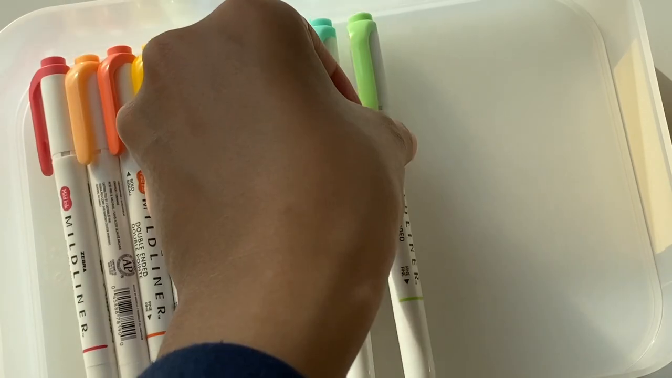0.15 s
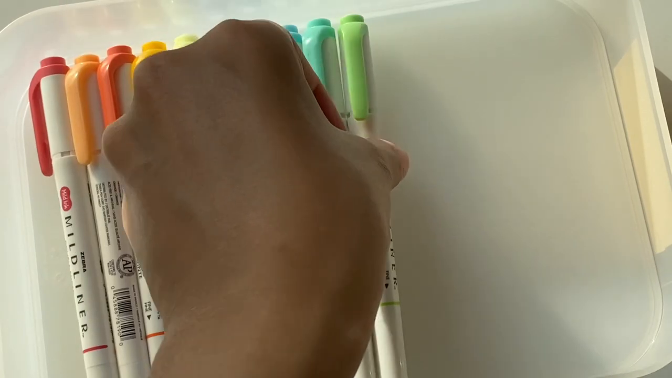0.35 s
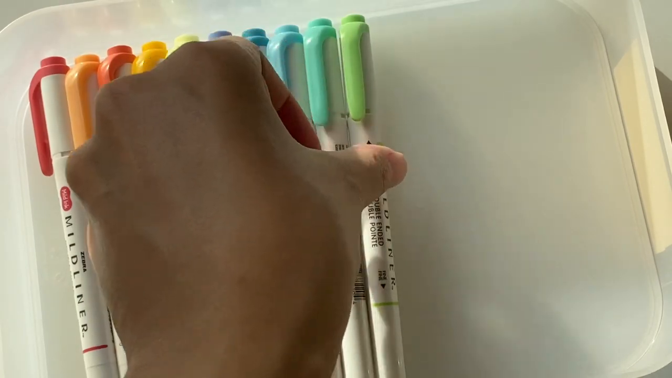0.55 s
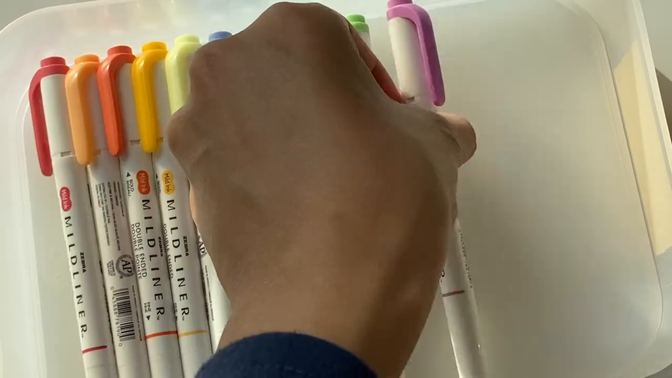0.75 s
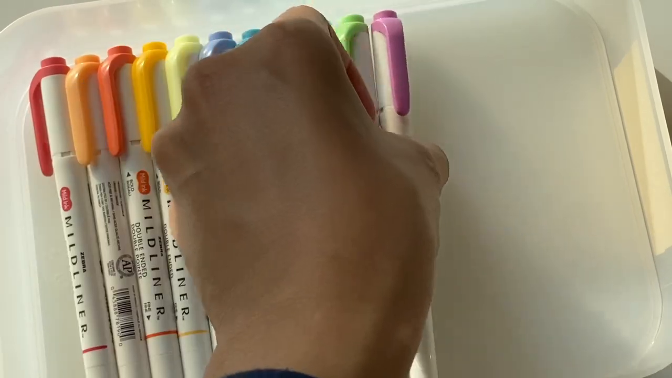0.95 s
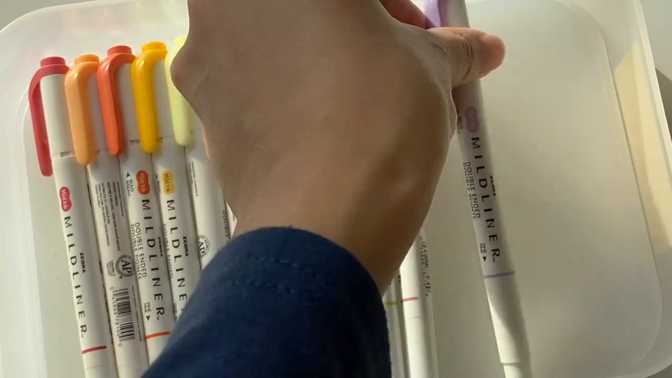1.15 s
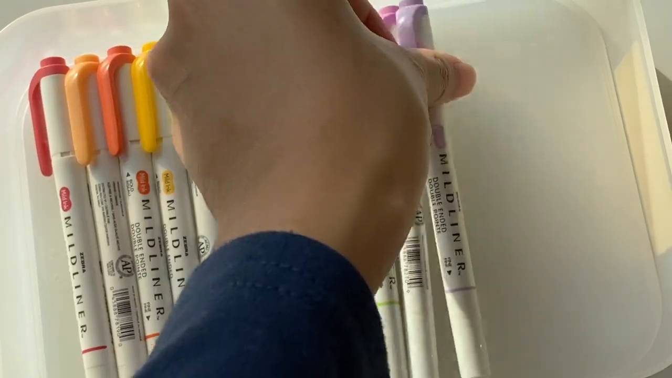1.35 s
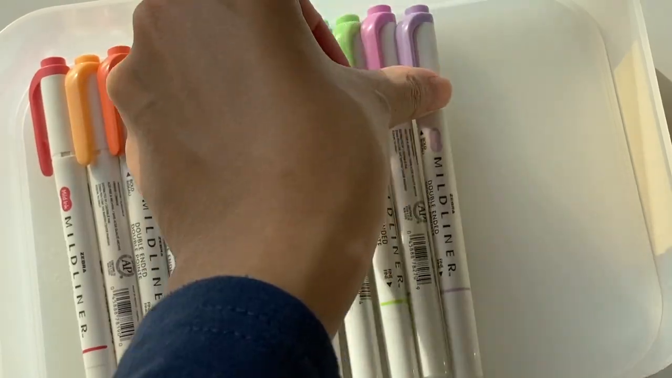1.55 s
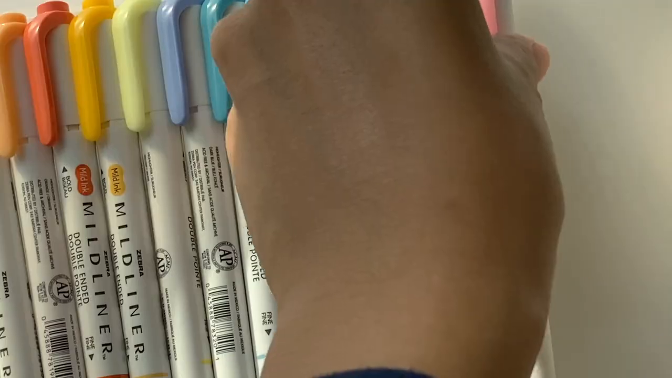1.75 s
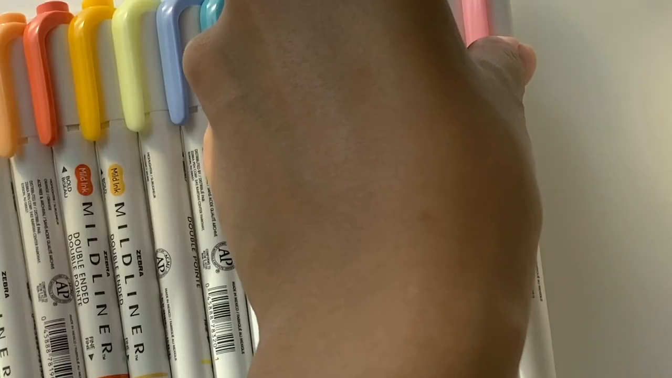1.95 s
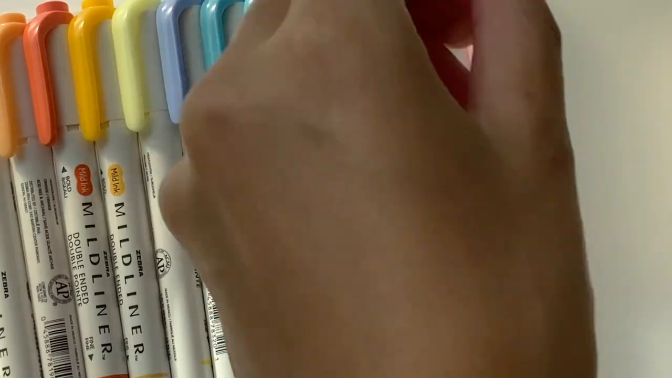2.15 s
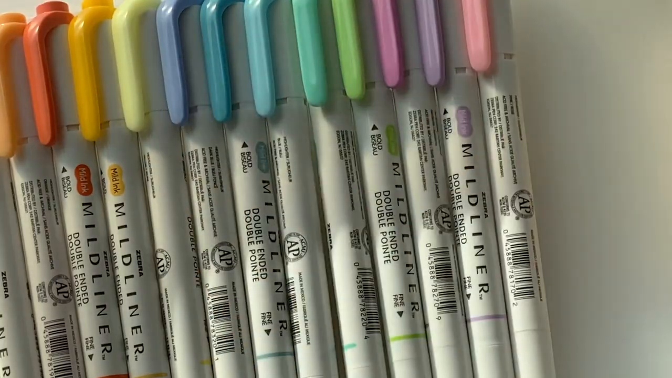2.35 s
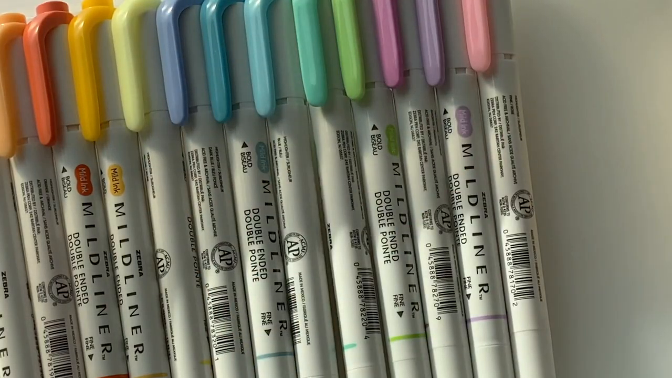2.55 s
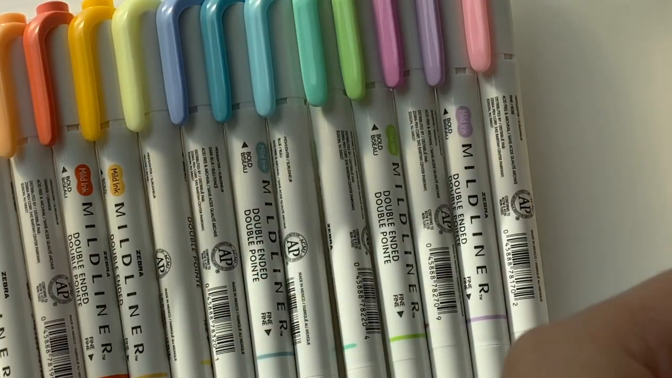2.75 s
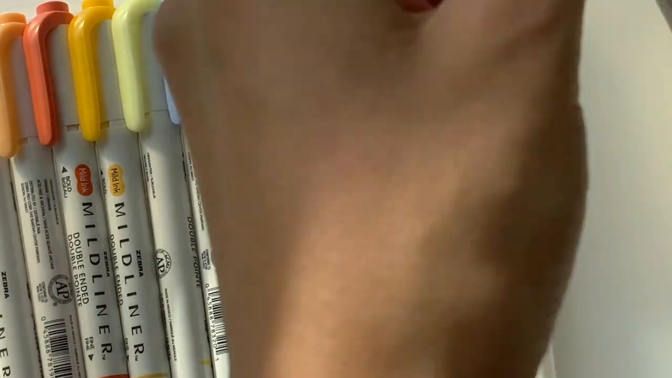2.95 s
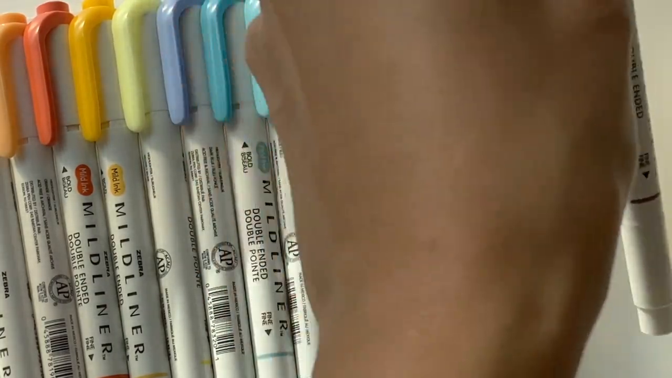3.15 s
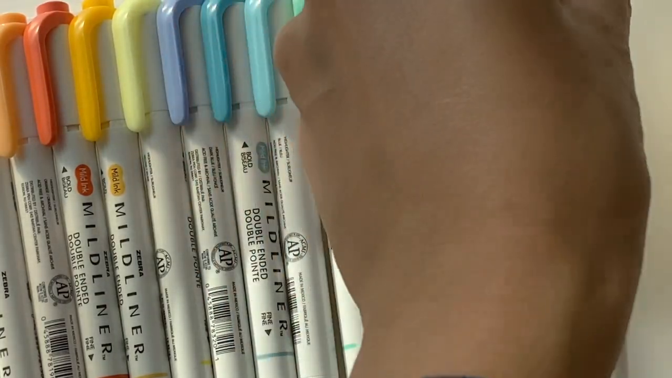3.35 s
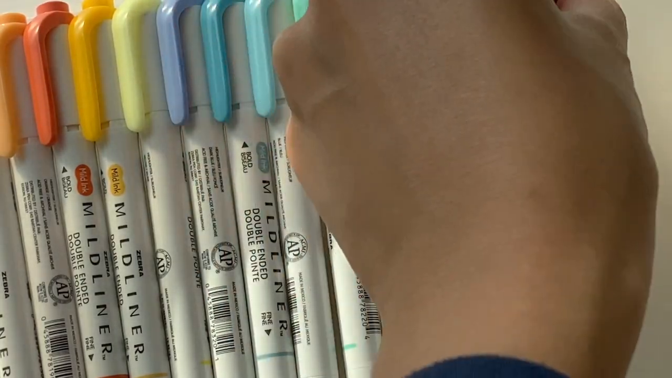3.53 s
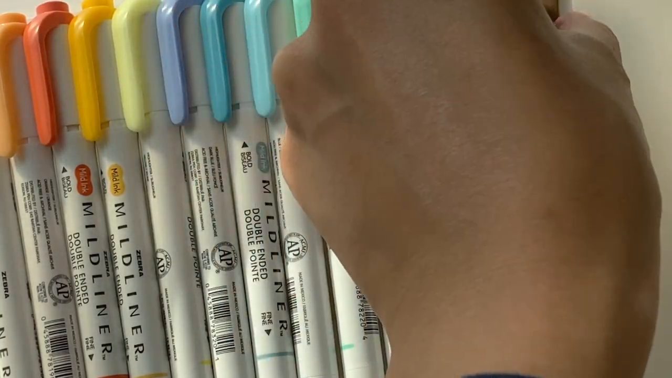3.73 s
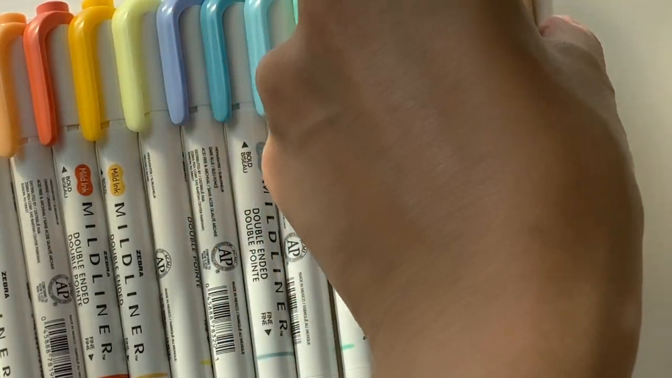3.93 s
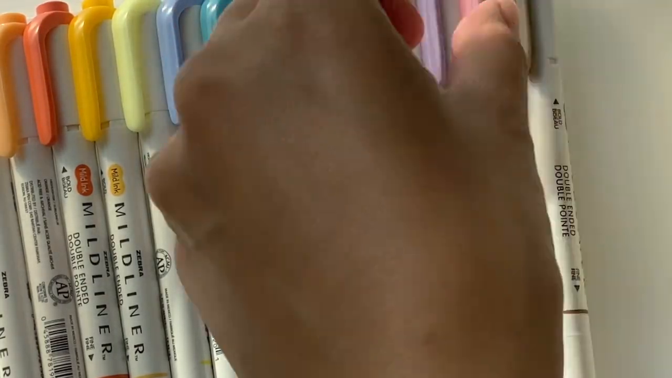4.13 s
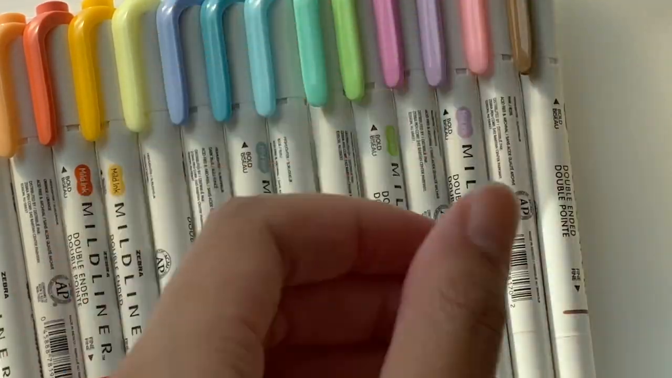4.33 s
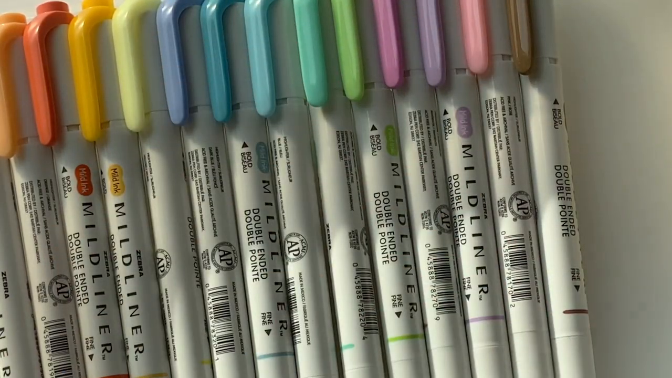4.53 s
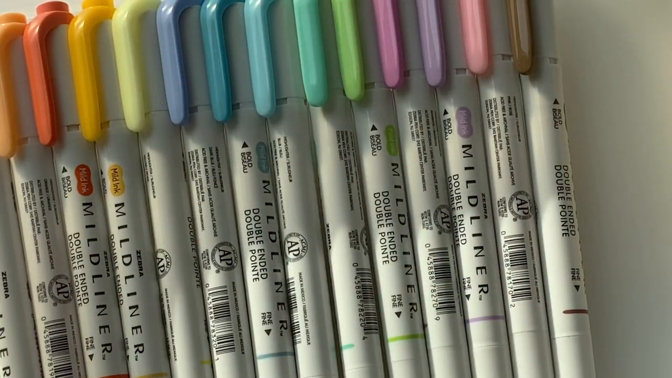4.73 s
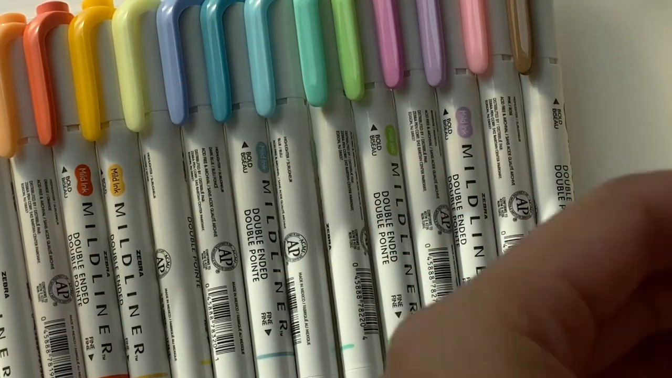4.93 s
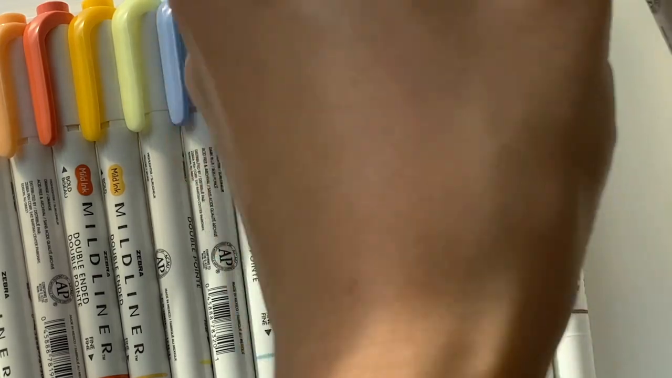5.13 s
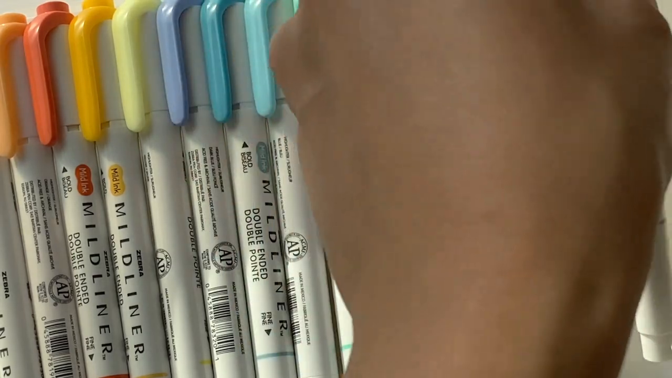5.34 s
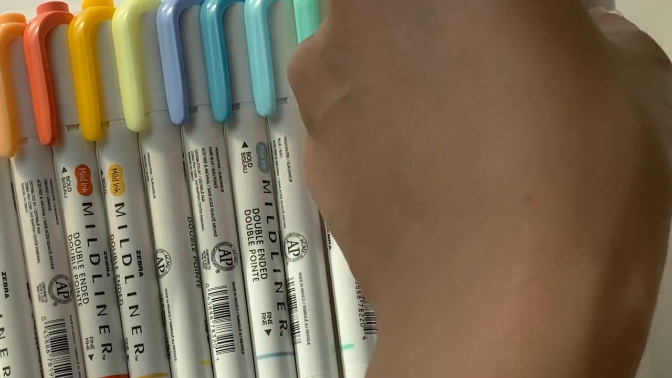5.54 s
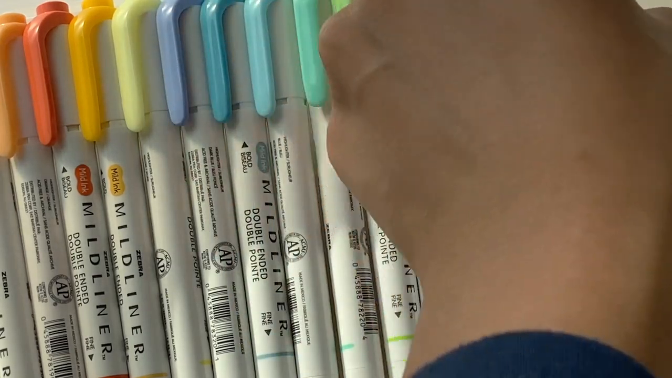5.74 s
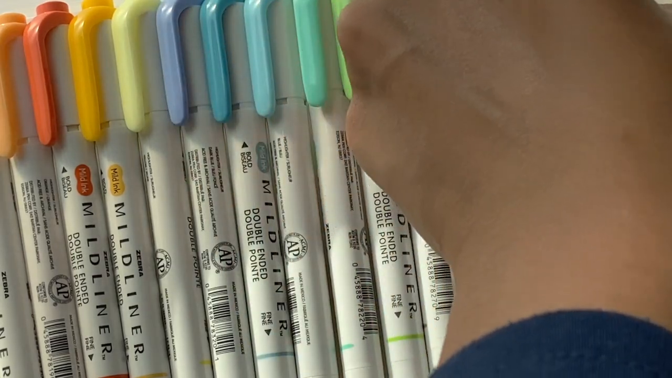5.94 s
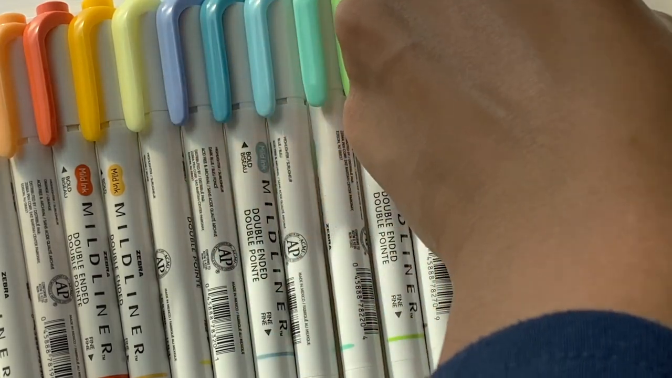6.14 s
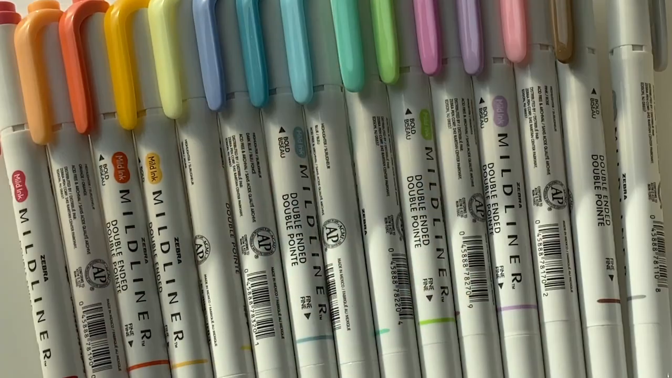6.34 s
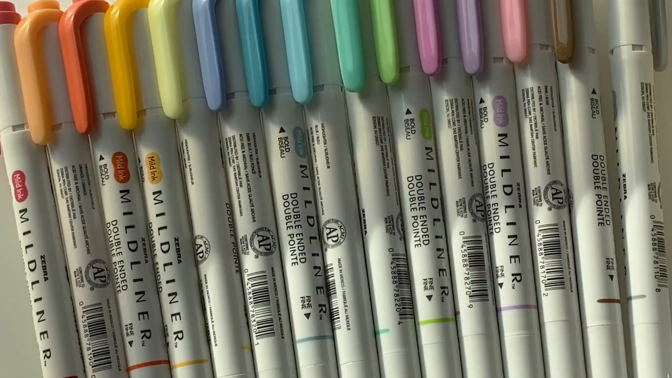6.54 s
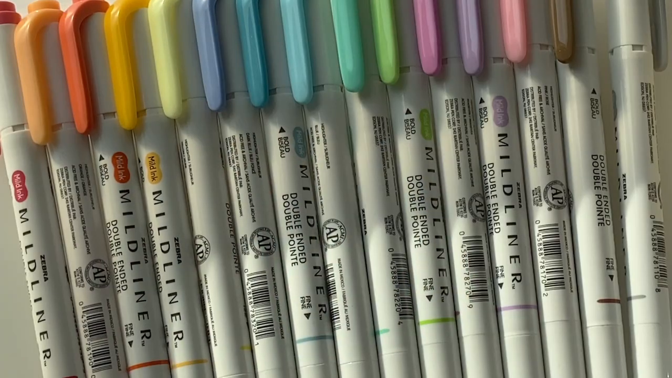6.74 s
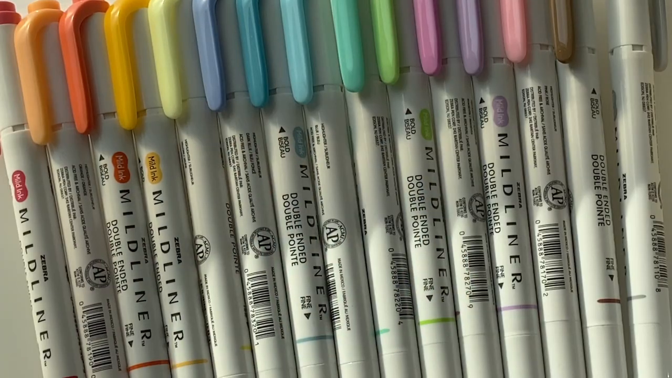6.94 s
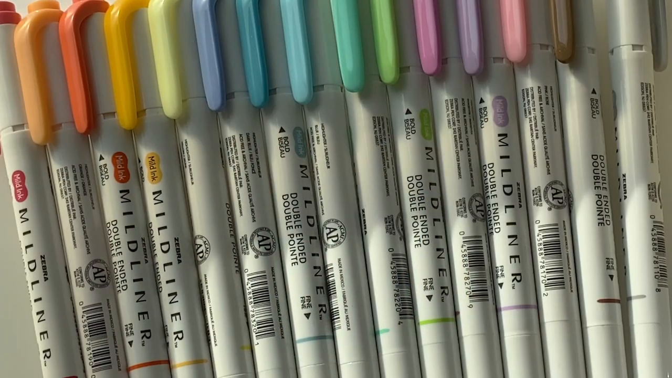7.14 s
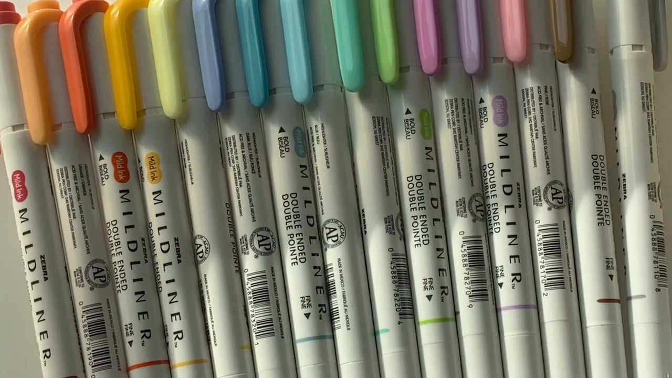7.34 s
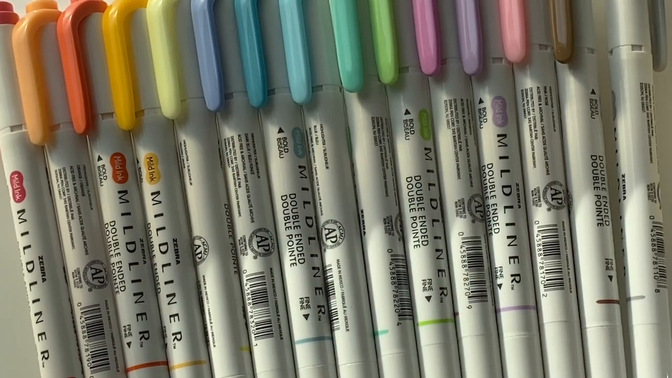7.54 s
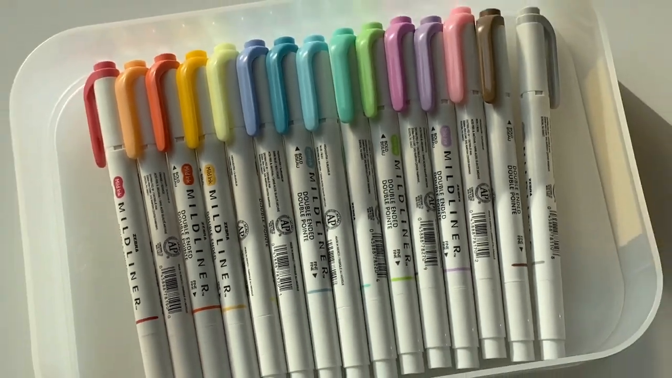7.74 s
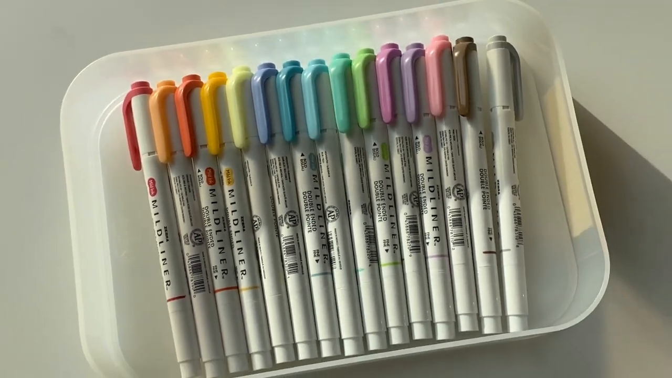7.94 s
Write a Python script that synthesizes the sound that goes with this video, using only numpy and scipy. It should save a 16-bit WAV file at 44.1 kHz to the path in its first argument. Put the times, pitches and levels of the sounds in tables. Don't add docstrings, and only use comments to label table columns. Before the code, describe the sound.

Three hard plastic pen clacks rattle a tray early on, then sparse clicks and taps break long near-silent stretches over faint rumble.

```python
import sys
import numpy as np
from scipy import signal
from scipy.fft import rfft, irfft, next_fast_len
from scipy.io import wavfile
from scipy.ndimage import uniform_filter1d

SR = 44100
rng = np.random.default_rng(int(sys.argv[2]) if len(sys.argv) > 2 else 0)


def volts(x):
    e = np.asarray(x, float) / 20
    return 10 ** e


def waveform_to_disk(signal):
    frames = np.transpose(np.atleast_2d(signal))
    scaled = np.clip(frames, -1, 1) * 32767
    samples = np.round(scaled).astype(np.int16)
    wavfile.write(sys.argv[1], SR, samples)


N = 351918

# start_s [s], level_db [dB], crack_db [dB re blow]
SCENES = [
    (0, -80, -1.5),
    (.074, -28, -30),
    (.778, -27, -17.5),
    (1.221, -11.5, -11),
    (1.815, -31.5, -40),
    (5.622, -35.5, -40),
    (6.188, -21.5, -14),
    (6.283, -130, 0),
]
# start_s [s], level_db [dB], cap_hz [Hz], barrel_hz [Hz], extra_thump_db [dB]
DROPS = [
    (0.1645, 4, 1962, 1260, 2.5),
    (0.801, 5, 2041, 1520, 1),
    (1.4436, 0, 2096, 1000, -0.5),
]
# delay_s [s], level_db [dB re blow], barrel_share [0 = cap pitch, 1 = barrel pitch],
# contact [name]
LANDING = [
    (-.002, -22.5, 0.1, "touch"),
    (0, -1, 0.13, "clack"),
    (.0042, -3, 1, "slap"),
    (.0097, -5, 1.1, "clack"),
]
CONTACT = {"clack": (-11, 650, 1.8), "slap": (-16.5, 680, 1.5), "tick": (-15, 260, 2.1),
           "click": (-23, 300, 2.1), "touch": (-7.5, 440, 2.1), "thud": (2.2, 735, 59),
           "press": (1.43, 455, 9.5)}
# start_s [s], level_db [dB], barrel_hz [Hz], crack_db [dB re blow]
CLACKS = [(.1954, -5.5, 2660, -15), (.376, -24, 2380, -18), (.778, -37, 1870, -23),
          (1.3168, -26.5, 1890, -31), (1.3693, -8.5, 1760, -25), (1.479, -7.5, 1750, -11.5),
          (1.6481, -8.5, 1584, -13.5), (1.6623, -13.5, 1760, -17), (3.4035, -12, 1390, -2),
          (3.4306, -13, 1820, -13), (5.4187, -16.5, 1480, -16.5), (6.0831, -35, 1305, -27)]
# start_s [s], level_db [dB], barrel_hz [Hz], crack_db [dB re blow]
TICKS = [(0.3224, -30, 1065, -12.5), (0.3383, -27.5, 1820, -13), (0.3592, -30.5, 1760, -14.5),
         (.3674, -26, 1937, -14), (1.3086, -26.5, 1750, -24.5), (1.7664, -41, 1983, -17),
         (2.6004, -56, 2266, -7.5), (3.5719, -32, 1450, -38.5), (5.8033, -50.5, 1220, -30),
         (6.2024, -9, 1356, -23.5), (5.5609, -30.5, 1120, -16.5)]
# start_s [s], level_db [dB], barrel_hz [Hz], crack_db [dB re blow]
CLICKS = [(0.2784, -19, 1950, -3), (.9682, -12.5, 2000, -11.5), (.9755, -23, 2340, -10),
          (.981, -24.5, 1950, -20), (5.4178, -18.5, 3080, -12), (6.2022, -7.5, 2350, -19.5),
          (7.6114, -54, 2080, -26), (1.7452, -33.5, 1010, -6), (2.342, -63, 3200, -6.5),
          (2.376, -34.5, 3450, -10), (5.7575, -39, 2000, -52)]
# start_s [s], level_db [dB], barrel_hz [Hz], crack_db [dB re blow]
TOUCHES = [(0.1397, -42, 1210, -24), (.153, -32, 1488, -24), (1.229, -23.5, 1007, -23),
           (1.243, -27, 1110, -20.5), (1.2907, -32.5, 1860, -17), (1.3457, -25, 1058, -27.5),
           (1.3524, -24.5, 1112, -3.5), (1.4103, -19.5, 1640, -9), (1.426, -20.5, 1850, -18.5),
           (1.4317, -11.5, 2016, -7.5), (3.3711, -21.5, 1610, -12.5), (3.3845, -23.5, 1399, -18),
           (3.8166, -44, 1340, -31.5), (3.8452, -34, 1080, -19), (6.1888, -41, 1820, -19),
           (5.4285, -19.5, 1370, -18.5)]
# start_s [s], level_db [dB], barrel_hz [Hz], crack_db [dB re blow]
THUDS = [
    (2.0213, -64.5, 1738, -14),
    (3.7075, -30.5, 1904, -30.5),
    (3.9709, -36.5, 1887, -44),
    (4.6474, -69, 980, -4),
    (7.501, -50, 2190, -29),
    (7.526, -62.5, 2200, -24),
]
# start_s [s], level_db [dB], barrel_hz [Hz], crack_db [dB re blow]
PRESSES = [
    (3.409, -19, 2000, -28),
    (3.7596, -39, 1430, -40),
    (6.107, -29, 1210, -36),
    (6.1543, -52, 2200, -19),
    (6.2102, -23.5, 1900, -33),
]
# pitch_hz [Hz], level_db [dB], t60_s [s]
TRAY_MODES = [(70.03, -0.5, 0.23), (115.4, -1, 0.16), (171, 0, .07), (258, -1, 0.029), (281, -1.5, 0.081),
              (353, 0, 0.059), (414, -1, .04), (520, -2, .04), (600.5, 1, 0.039), (678, -1, 0.024),
              (780, -3, 0.029), (878, -2, 0.03)]
# pitch_hz [Hz], level_db [dB], t60_s [s]
ROW_MODES = [(980, 1, 0.04), (1230, 0.5, 0.016), (1445, 3.5, .018), (1600, -15.5, .018), (1750, -6, 0.024),
             (1950, -2, .018), (2180, -0.5, 0.033), (2350, 1, .015), (2860, -5, .015), (2940, -3, 0.018),
             (3300, -2.5, 0.014), (3500, -7.5, .012)]
# pitch_hz [Hz], level_db [dB per Hz]
CRACK_COLOUR = [(2350, -30), (4000, -6), (4760, -7.5), (6160, -7), (9260, -22), (13300, -23),
                (15000, -26.5), (16100, -25.5)]
# start_s [s], level_above_8k_db [dB]
HAND_SHADE = [(0, -1.5), (1.5, -1), (1.65, -3.5), (3.4, -4.5), (5.4, -5.5), (6.2, -9)]
# pitch_hz [Hz], t60_s [s]
ROOM_T60 = [(100, 0.94), (300, 0.32), (1000, 0.37), (3000, 0.3), (8000, 0.26), (16000, 0.79)]
# pitch_hz [Hz], level_db [dB]
ROOM_COLOUR = [(80, 2), (250, 3), (600, 1.5), (1500, -1), (2500, 0.5), (4000, 2), (10000, 0.5),
               (14800, -4.5), (15800, -25)]
# pitch_hz [Hz], side_to_mid_db [dB]
ROOM_SIDE = [(60, -20.5), (99, -20.5), (160, -10), (270, -11), (450, -3), (740, -1), (1220, 3.5),
             (2010, -10.5), (3330, -17), (5500, -47.5), (9080, -0.5), (15000, 0.5)]
# pitch_hz [Hz], side_to_mid_db [dB]
NEAR_SIDE = [(60, -13), (300, -12.5), (740, -8), (1220, -8), (2000, -17.5), (5500, -20), (7000, -9.5),
             (8500, 4.5), (15000, -1)]
# pitch_hz [Hz], level_db [dB]
TREBLE_GAPS = [(8300, 1.5), (8800, -30.5), (9300, -30.5), (9700, 1), (12500, 1.5), (12900, -29.5), (13600, -31),
               (13900, 1)]
# pitch_hz [Hz], level_db [dB per bin]
GATE = [(100, -100), (600, -85.5), (2000, -90), (5000, -97.5), (8500, -97), (10000, -91), (16000, -90)]
# start_s [s], length_s [s], level_db [dB], pitch_hz [Hz], width [octaves]
SLIDES = [(0.122, 0.028, -58, 1450, 1.2), (0.791, 0.026, -39.5, 2690, 1.96),
          (2.372, .07, -67.5, 3400, 0.43), (3.707, 0.2, -62.5, 1600, 1.14),
          (3.813, 0.03, -71.5, 5400, 0.093), (3.949, 0.067, -60, 1486, 1.04),
          (3.709, 0.059, -48.5, 260, 1.1), (3.971, 0.095, -53, 278, 1.2), (5.501, .3, -57.5, 189, 0.63),
          (5.403, 0.0128, -62, 3430, 0.59), (5.753, 0.066, -67, 1910, 0.55),
          (6.028, .03, -71.5, 2005, 0.508), (6.086, 0.0474, -66.5, 3470, 1.17)]
# peak_s [s], level_db [dB], rise_s [s], fade_s [s]
STROKES = [
    (2.13, -72, .12, .12),
    (2.205, -74, .05, .12),
    (2.373, -63, .025, 0.14),
    (2.61, -66, 0.11, .12),
    (4.612, -77, .06, .03),
    (4.646, -73.5, .006, .055),
    (4.778, -66.5, .06, .14),
    (5.0, -74.5, .15, .01),
]
# pitch_hz [Hz], level_db [dB per Hz]
CLOTH_COLOUR = [(880, -40), (1500, -31), (2280, -5.5), (3160, -30), (4940, -7.5), (9060, -15),
                (10000, -4.5), (16100, -5.5)]
# pitch_hz [Hz], level_db [dB per Hz]
AIR_COLOUR = [(15, -46), (25, -14.5), (43, -7), (64, 2.5), (92, -10), (151, -8.5), (211, -17.5),
              (282, -23.5), (304, -29), (365, -25.5), (526, -31.5), (682, -30), (909, -39.5), (6570, -50),
              (12600, -55.5), (16400, -88), (22000, -120)]
# pitch_hz [Hz], side_to_mid_db [dB]
AIR_SIDE = [(60, -18), (110, -13.5), (200, -3.5), (380, -8), (700, -7), (1290, -0.5), (2380, -13.5),
            (4400, -25), (8120, -2), (15000, 2)]

ROOM_DB, ROW_DB, RATTLE_DB, AIR_DB = -13, -2, -4, -52
LANDING_CRACK_DB = -15
LEAN_DB = 1
TAIL_BARREL_HZ = 1650
TAIL_LEAD_S = .04
SHIMMER_HZ = 34
STROKE_DEPTH_DB = 24.5


def evened(x):
    return x / np.sqrt(np.mean(x ** 2) + 1e-20)


def peaked(x):
    return x / (abs(x).max() + 1e-20)


def read(points, hz):
    f, value = np.transpose(points)
    return np.interp(np.log(hz + 1), np.log(f + 1), value)


def colour(x, points):
    size = next_fast_len(len(x) + 2048)
    gain = volts(read(points, np.fft.rfftfreq(size, 1 / SR)))
    return irfft(rfft(x, size) * gain, size)[:len(x)]


def add(mix, s, sound):
    part = mix[max(round(s * SR), 0):][:len(sound)]
    part += sound[:len(part)]


def pens():
    blows = contacts()
    luck = rng.standard_normal((len(blows), 3, 26))
    grit = rng.standard_normal((len(blows), 4000))
    sounds = [blow(*row, luck[j], grit[j]) for j, row in enumerate(blows)]
    tails = [(room_tail(), colour(room_tail(), ROOM_SIDE)) for _ in range(3)]
    starts = [row[0] for row in SCENES]
    ends = starts[1:] + [N / SR]
    out, t = np.zeros((2, N)), np.arange(N) / SR
    for k, (start, end) in enumerate(zip(starts, ends)):
        near, wall = np.zeros((2, N))
        add(near, start - TAIL_LEAD_S, sounds[k][:1200])
        for j in range(len(SCENES), len(blows)):
            s = blows[j][0]
            if start <= s < end:
                add(near, s, sounds[j])
                add(wall, s + 0.0012, sounds[j] * np.sign(luck[j, 0, -1]))
        span = slice(max(round((start - TAIL_LEAD_S) * SR), 0), round(end * SR) + 100)
        now, direct = t[span], near[span]
        wet = 0
        for m, pair in enumerate(tails):
            face = direct * np.sqrt(2 / 3) * np.cos(2 * np.pi * (SHIMMER_HZ * now + m / 3))
            wet = wet + volts(ROOM_DB) * signal.fftconvolve(face[None], pair, axes=1)[:, :len(face)]
        lean = np.tanh(LEAN_DB * np.log(10) / 40) * signal.lfilter([.25], [1, -.75], direct)
        fade = np.clip((now - start) / .002, 0, 1) * np.clip((end - now) / .002, 0, 1)
        out[0, span] += fade * (direct + wet[0])
        out[1, span] += fade * (lean + colour(wall[span], NEAR_SIDE) + wet[1])
    return out


def contacts():
    rows = [(s, db, TAIL_BARREL_HZ, crack_db, "touch", 5.0) for s, db, crack_db in SCENES]
    for s, db, cap_hz, barrel_hz, weight_db in DROPS:
        for wait, less, share, kind in LANDING:
            hz = cap_hz + share * (barrel_hz - cap_hz)
            rows.append((s + wait, db + less, hz, LANDING_CRACK_DB, kind, weight_db))
    for kind, table in [("clack", CLACKS), ("tick", TICKS), ("click", CLICKS),
                        ("touch", TOUCHES), ("thud", THUDS), ("press", PRESSES)]:
        rows += [(*row, kind, 0) for row in table]
    full = []
    for s, db, hz, crack_db, kind, more_db in rows:
        thump_db, tray_hz, focus = CONTACT[kind]
        full.append((s, db, hz, thump_db + more_db, crack_db, tray_hz, focus))
    return full


def blow(s, blow_db, barrel_hz, thump_db, crack_db, tray_hz, tray_focus_db, luck, grit):
    t = np.arange(len(grit)) / SR
    dull_db = .5 * min(crack_db + 16, 0)
    barrel_modes = [(barrel_hz, 0, .009), (barrel_hz * 1.37, -5.0 + dull_db / 2, .006)]
    barrel = ring(barrel_modes, t, luck, barrel_hz, focus_db=1, spread_db=4.5, detune=.01, turns=0.76)
    soft = [(hz, db + dull_db * max(np.log2(hz / 2700), 0) / 0.11, t60) for hz, db, t60 in ROW_MODES]
    row = ring(soft, t, luck[:, 2:], barrel_hz, focus_db=3.0, spread_db=1.5, detune=0.061, turns=.8)
    tray = ring(TRAY_MODES, t, luck[:, 14:], tray_hz, tray_focus_db, spread_db=2.5, detune=.06, turns=1.3)

    around = [(300, -24), (barrel_hz / 1.1, 0), (barrel_hz * 1.1, 0),
              (barrel_hz * 3.3, -20 + dull_db), (barrel_hz * 5, -60)]
    knocks = grit[::-1] * volts(-60 * t / 0.076) * (1 - np.exp(-t / 0.0011))
    rattle = peaked(colour(knocks, around))

    snap = grit * volts(-60 * t / 0.014) * (1 - np.exp(-t / .0003))
    buzz = colour(grit * volts(-16.5 - 60 * t / 0.07) * (1 - np.exp(-t / 0.00067)), TREBLE_GAPS)
    crack = peaked(colour(snap + buzz, CRACK_COLOUR + [(16600, -58.5)]))
    crack = colour(crack, [(6500, 0.0021), (9500, np.interp(s, *np.transpose(HAND_SHADE)))])

    shake = volts(.6 * min(thump_db + 12, 3))
    loose = volts(RATTLE_DB + 0.38 * blow_db)
    body = peaked(barrel + shake * (volts(ROW_DB) * row + loose * rattle))
    return volts(blow_db) * (body + volts(thump_db + 2) * tray + volts(crack_db + 5.5) * crack)


def ring(modes, t, luck, near_hz, focus_db, spread_db, detune, turns):
    hz, db, t60 = np.transpose(modes)[:, :, None]
    level_luck, pitch_luck, phase = luck[:3, :len(modes), None]
    db = db + spread_db * level_luck - focus_db * np.log2(hz / near_hz) ** 2
    swell = (1 - np.exp(-t * hz / turns)) ** 2
    wave = np.sin(2 * np.pi * hz * (1 + detune * pitch_luck) * t + phase)
    return peaked((swell * volts(db - 60 * t / t60) * wave).sum(0))


def room_tail():
    hz, t, z = signal.stft(rng.standard_normal(SR), SR, nperseg=256)
    decay = volts(-60 * t / read(ROOM_T60, hz)[:, None])
    tail = signal.istft(z * decay, SR, nperseg=256)[1][:SR]
    tail = colour(tail * (1 - np.exp(-np.arange(SR) / SR / 0.006)), ROOM_COLOUR)
    tail = colour(tail, TREBLE_GAPS)
    return tail / np.linalg.norm(tail)


def suppressed(x):
    hz, _, z = signal.stft(x, SR, nperseg=256)
    recent = uniform_filter1d(uniform_filter1d(abs(z[0]) ** 2, 7, 1), 9, 0)
    power = abs(recent) + 1e-20
    floor = volts(read(GATE, hz)[:, None]) ** 2
    return signal.istft(z / (1 + (floor / power) ** 1.9), SR, nperseg=256)[1][:, :N]


def slides():
    mid, grit = np.zeros(N), rng.standard_normal((len(SLIDES), SR // 3))
    for (s, *row), g in zip(SLIDES, grit):
        add(mid, s, slide(*row, g))
    return np.array([mid, colour(np.roll(mid, 20), NEAR_SIDE)])


def slide(length, db, hz, octaves, grit):
    band = [(hz / 2 ** (3 * octaves), -70), (hz / 2 ** (2 * octaves), -30), (hz / 2 ** (octaves / 2), -3),
            (hz * 2 ** (octaves / 2), -3), (hz * 2 ** (0.54 * octaves), -30), (hz * 2 ** (2.2 * octaves), -80)]
    size = round(length * SR)
    grains = grit[:size] * abs(grit[::-1][:size])
    return volts(db) * evened(colour(grains, band)) * signal.windows.tukey(size, .5)


def sleeve():
    t, level = np.arange(N) / SR, np.zeros(N)
    for s, db, rise, fade in STROKES:
        level += volts(db - STROKE_DEPTH_DB * np.maximum((s - t) / rise, (t - s) / fade))
    clumps = evened(uniform_filter1d(rng.standard_normal(N), 150))
    grains = rng.standard_normal((2, N)) * volts(1.64 * clumps)
    mid, side = (evened(colour(g, CLOTH_COLOUR)) for g in grains)
    return volts(2.5) * level * np.array([mid, colour(side, AIR_SIDE)])


def air():
    lumps = evened(uniform_filter1d(uniform_filter1d(rng.standard_normal(N), 5000), 5000))
    white = rng.standard_normal((2, N))
    rumble = signal.sosfilt(signal.butter(2, 160, fs=SR, output="sos"), white)
    uneven = white + (volts(0.98 * lumps) - 1) * rumble
    mid, side = (colour(v, AIR_COLOUR) for v in uneven)
    return volts(AIR_DB) * np.array([mid, colour(side, AIR_SIDE)]) / mid.std()


def scene():
    background = np.array([colour(v, TREBLE_GAPS) for v in air() + sleeve()])
    mid, side = suppressed(pens()) + slides() + background
    return np.array([mid + side, mid - side])


def roll_off(x):
    return signal.sosfilt(signal.butter(12, 16260, fs=SR, output="sos"), x)


def record(dry):
    return roll_off(np.clip(dry, -1, 1))


dry = scene()
out = record(dry)
waveform_to_disk(out)
```